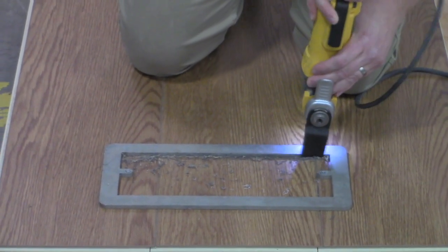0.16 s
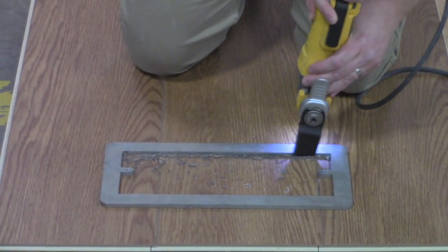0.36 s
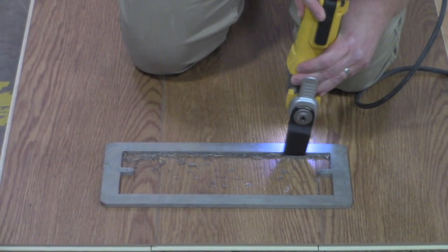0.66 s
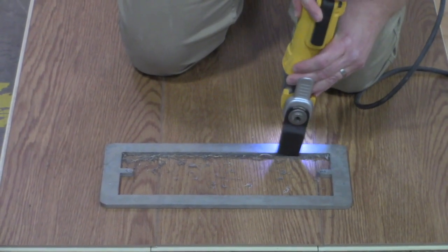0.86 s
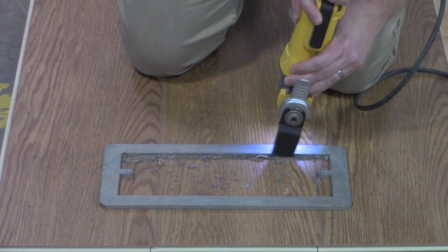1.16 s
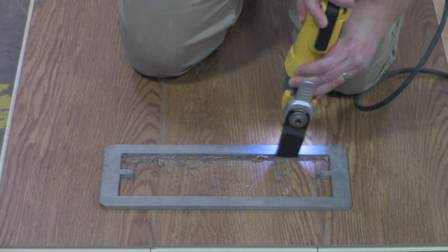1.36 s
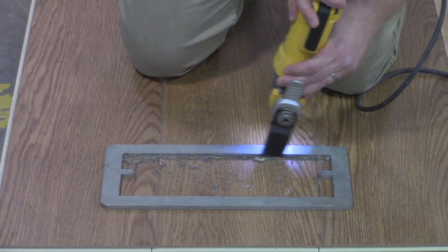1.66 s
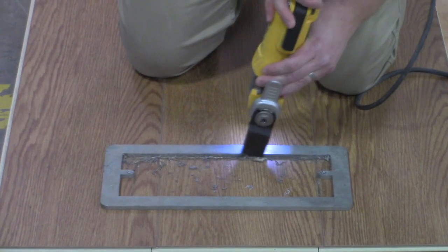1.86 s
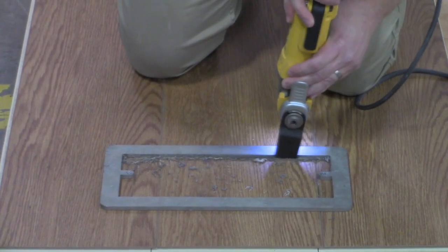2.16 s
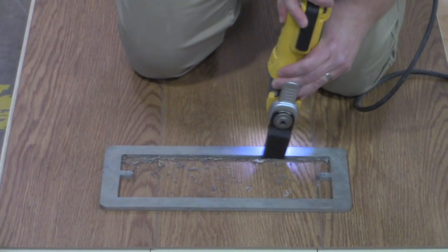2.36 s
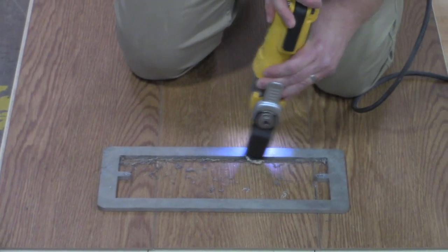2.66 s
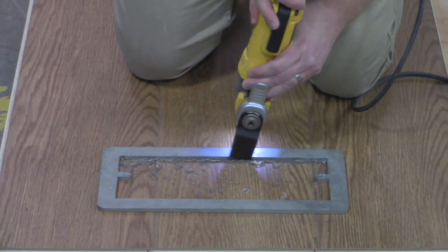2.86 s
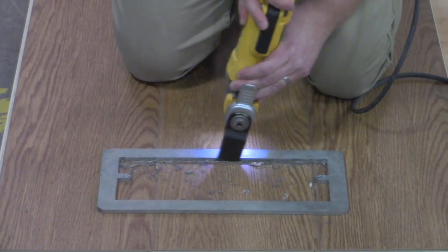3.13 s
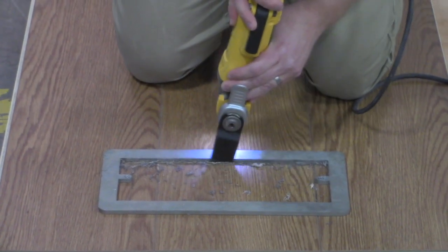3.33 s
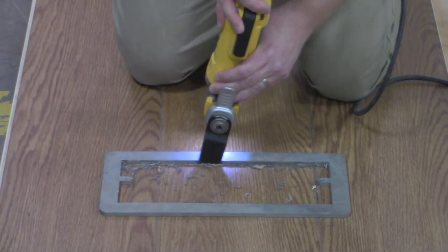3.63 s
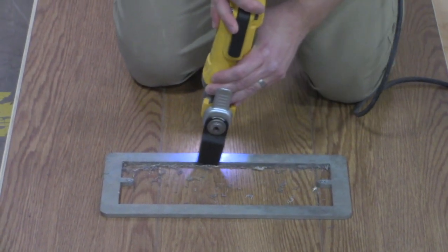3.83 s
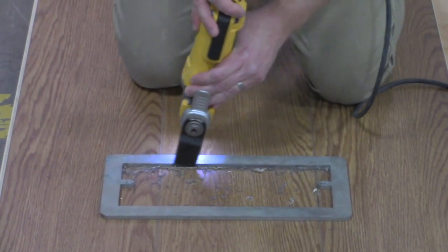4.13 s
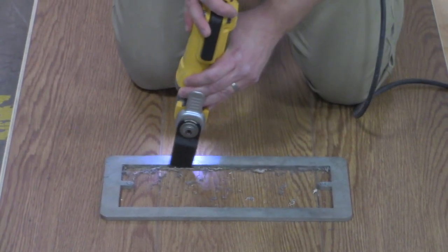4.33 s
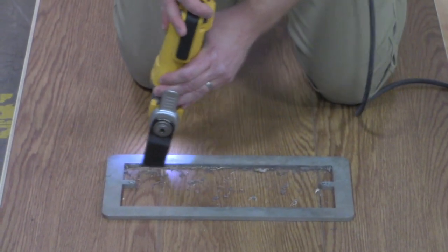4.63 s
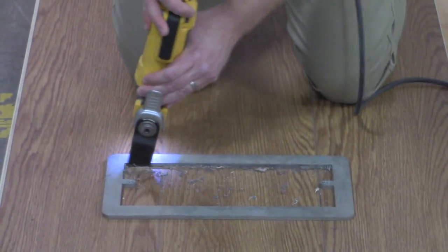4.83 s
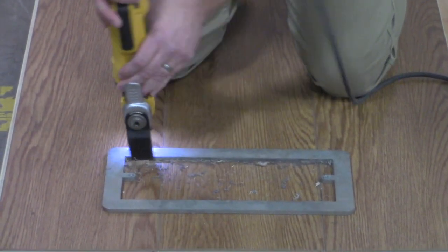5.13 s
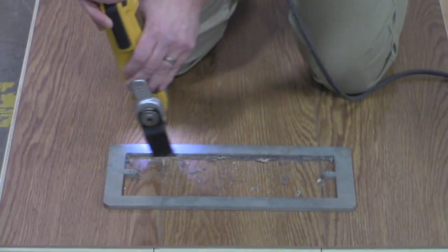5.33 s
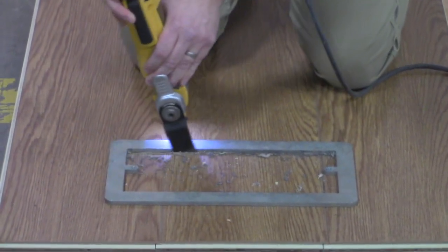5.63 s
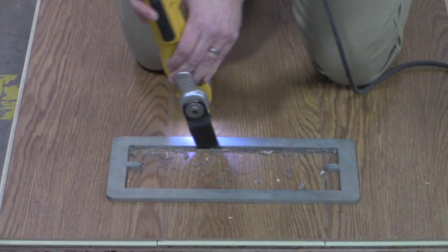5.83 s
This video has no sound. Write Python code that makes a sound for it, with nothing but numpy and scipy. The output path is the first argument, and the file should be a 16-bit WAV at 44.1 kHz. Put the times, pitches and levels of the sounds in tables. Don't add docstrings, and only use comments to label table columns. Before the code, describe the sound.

A corded oscillating saw buzzes in a harsh, nasal whine, sagging and recovering as its blade grinds along a slot in a wooden floor.

```python
import sys
import numpy as np
from scipy import signal
from scipy.fft import rfft, irfft
from scipy.io import wavfile
from scipy.ndimage import uniform_filter1d

SR = 44100
rng = np.random.default_rng(int(sys.argv[2]) if len(sys.argv) > 2 else 0)


def field_ratio(decibels):
    return 10 ** (np.asarray(decibels, dtype=float) / 20)


def int16_out(signal):
    q = np.round(np.clip(np.atleast_2d(signal).T, -1, 1) * 32767)
    wavfile.write(sys.argv[1], SR, q.astype(np.int16))


N = 264159
HOP = 128

ZONES_HZ = [900, 2900, 5400, 16000]


def curve(table, t):
    times, values = np.transpose(table)
    return np.interp(t, times, values)


def held(table, t):
    rows = np.array(table, float)
    current = np.searchsorted(rows[:, 0], t, "right") - 1
    return rows[np.clip(current, 0, None), 1:].T


def bursts(table, t, rise_db_s, fall_db_s, rest_db):
    start, hold, db = np.transpose(table)[:, :, None]
    early = np.maximum(start - t, 0)
    late = np.maximum(t - start - hold, 0)
    db = db - rise_db_s * early - fall_db_s * late
    return 10 * np.log10(np.sum(field_ratio(2 * db), axis=0) + field_ratio(2 * rest_db))


def bumps(table, t):
    centre, width, size = np.transpose(table)[:, :, None]
    return np.sum(size * np.exp(-((t - centre) / width) ** 2), axis=0)


def walk(rate_hz, count):
    k = max(int(SR / HOP / rate_hz), 1)
    x = rng.standard_normal((count, N // HOP + 2))
    x = uniform_filter1d(uniform_filter1d(x, k, axis=1), k, axis=1)
    return x / x.std(axis=1, keepdims=True)


def up(x):
    return np.interp(np.arange(N), HOP * np.arange(len(x)), x)


def colour_db(table, hz):
    f, db = np.transpose(table)
    return np.interp(np.log(np.maximum(hz, 1)), np.log(f), db)


def band(x, lo_hz, hi_hz):
    # (frequency [Hz], density [dB per Hz])
    scrape_colour = [(35, -69), (60, -19), (322, -5.5), (379, -1.5), (489, -13.5), (745, 0), (962, -7),
                     (1500, -5), (1680, -5), (1850, -2.5), (4700, 0.5), (10400, -2), (15800, -19.5)]
    hz = np.fft.rfftfreq(N, 1 / SR)
    inside = (hz >= lo_hz) & (hz < hi_hz)
    y = irfft(rfft(x) * field_ratio(colour_db(scrape_colour, hz)) * inside, N)
    return y / y.std()


def motor(t):
    # (time [s], stroke rate [Hz])
    speed = [(0.0, 335.4), (0.17, 356), (0.535, 380.7), (0.874, 341.2), (1.139, 326.4), (1.356, 342),
             (1.579, 382.8), (1.783, 377.4), (2.604, 374), (2.953, 357), (3.28, 333.9), (3.449, 318.7),
             (4.265, 334.9), (4.484, 317.9), (5.001, 350.1), (5.44, 376.6), (5.534, 379.5), (5.99, 349.2)]
    # (time [s], half width [s], sag [Hz])
    bogs = [
        (2.106, 0.15, 48),
        (3.083, 0.094, 21),
        (5.211, 0.12, 17),
        (1.186, 0.088, -4),
        (3.799, 0.098, -6),
        (3.93, 0.18, 5),
        (4.761, 0.032, 3),
    ]
    hz = up(curve(speed, t) - bumps(bogs, t))
    return uniform_filter1d(hz, size=SR // 20, mode="nearest")


def cut(t):
    # (time [s], blade hiss [dB])
    work = [(0.0, -42.5), (0.08, -43.5), (1.33, -47.5), (1.4, -52.5), (1.65, -42.5), (2.03, -49),
            (2.38, -42.5), (3.22, -47.5), (3.6, -41), (3.75, -50), (4.05, -41.5), (4.14, -50), (4.59, -44),
            (4.74, -46.5), (5.19, -40), (5.25, -48.5), (5.55, -40.5), (5.99, -44)]
    # (start [s], hold [s], level [dB])
    pushes = [(0.081, 0.005, -40), (0.206, 0.033, -39.5), (0.446, 0.097, -33), (0.641, 0.086, -40.5),
              (0.812, 0.18, -35), (1.054, 0.28, -38.5), (1.187, 0.018, -34.5), (1.321, 0.027, -37),
              (1.611, 0.3, -37.5), (1.661, 0.06, -34.5), (2.067, 0.015, -41.5), (2.354, 0.24, -37.5),
              (2.43, 0.055, -37.5), (2.669, 0.038, -36.5), (2.761, 0.17, -39), (3.029, 0.094, -40),
              (3.226, 0.25, -39.5), (3.546, 0.15, -35.5), (3.903, 0.29, -37), (4.078, 0.049, -37.6),
              (4.301, 0.24, -41.0), (4.603, 0.14, -36), (4.856, 0.053, -42.5), (4.991, 0.014, -40.5),
              (5.097, 0.11, -34), (5.408, 0.25, -42.8), (5.74, 0.034, -39.3), (5.854, 0.11, -41)]
    # (start [s], hold [s], level [dB])
    chatters = [(0.225, 0.073, -42), (0.96, 0.033, -39), (1.177, 0.013, -33.5), (1.271, 0.016, -39),
                (1.721, 0.067, -40), (2.177, 0.16, -45), (2.391, 0.246, -40.5), (2.708, 0.029, -39.5),
                (2.836, 0.089, -41), (3.203, 0.099, -40.2), (3.535, 0.093, -36.5), (4.049, 0.049, -38),
                (4.553, 0.12, -37.5), (4.953, 0.021, -40.5), (5.034, 0.12, -39.5), (5.506, 0.134, -40.4),
                (5.747, 0.13, -40.5), (5.96, 0.018, -36.0)]
    # (start [s], hold [s], added rasp share [0-1])
    tears = [
        (0.187, 0.076, 0.16),
        (1.876, 0.092, 0.16),
        (2.25, .09, 0.3),
        (2.747, .19, 0.13),
        (2.938, .09, 0.24),
        (3.37, 0.13, 0.13),
        (4.736, .34, 0.13),
        (5.508, .23, 0.33),
    ]
    blade_db = curve(work, t)
    board_db = bursts(pushes, t, rise_db_s=197, fall_db_s=277, rest_db=-46)
    teeth_rest_db = -41.5 + 0.32 * (board_db + 39.5) + 0.17 * (blade_db - blade_db.mean())
    teeth_db = bursts(chatters, t, rise_db_s=280, fall_db_s=300, rest_db=teeth_rest_db)
    torn = sum(share * (t >= s) * (t < s + hold) for s, hold, share in tears)
    board_rasp = field_ratio(2 * (-51.5 - board_db)) + torn
    teeth_rasp = np.minimum(field_ratio(2 * (-48 - teeth_db)), .33) + 0.8 * torn
    blade_rasp = 0.18 + teeth_rasp
    return np.array([board_db, teeth_db, blade_db]), np.array([board_rasp, teeth_rasp, blade_rasp])


def singing(t, phase, hz, zone_gain, loose, count=40):
    # (frequency [Hz], level [dB])
    tone_colour = [(530, -48), (900, 2.5), (1120, 1), (1650, 2.5), (2060, 0), (2310, 2), (4540, 0.5),
                   (6410, -15), (7980, -12), (14000, -32)]
    # (time [s], multiple the board favours [number],
    # second favourite [number], multiple two blows cancel [number], multiple the teeth favour [number])
    grip = [(0.0, 6, 8, 3, 13), (0.19, 4, 6, 3, 12), (0.4, 6, 3, 8, 12), (0.6, 4, 5, 8, 11),
            (0.95, 7, 5, 3, 10), (1.39, 6, 3, 4, 9), (1.56, 4, 6, 8, 11), (1.64, 6, 4, 7, 12),
            (1.87, 4, 5, 3, 11), (1.96, 5, 7, 4, 13), (2.25, 6, 3, 7, 12), (2.6, 5, 6, 3, 12),
            (2.82, 4, 6, 5, 12), (3.03, 5, 7, 4, 13), (3.37, 3, 5, 8, 13), (3.51, 7, 6, 4, 13),
            (3.84, 5, 7, 6, 13), (4.07, 7, 8, 4, 13), (4.22, 3, 5, 6, 12), (4.56, 8, 5, 3, 10),
            (4.73, 7, 3, 6, 9), (4.93, 7, 4, 3, 12), (5.25, 6, 7, 4, 11), (5.51, 7, 8, 4, 13)]
    grip_db = [7, 4, -5, 6.5]
    blade_ring_hz, ring_width_hz, ring_db = 9400, 800, 5
    k = np.arange(3, count)[:, None]
    f = k * hz
    db = colour_db(tone_colour, f) + ring_db / (1 + ((f - blade_ring_hz) / ring_width_hz) ** 2)
    db += (1.2 + 1.2 * (k > 8)) * walk(8, count=len(k))
    db += 2.8 * loose * walk(24, count=len(k))
    lift = sum(lift_db * (k == np.round(m)) for lift_db, m in zip(grip_db, held(grip, t)))
    db += uniform_filter1d(lift, size=5, axis=1)
    gain = field_ratio(db)
    zone = np.clip(np.digitize(f, ZONES_HZ) - 1, 0, 2)
    for z in range(3):
        power = np.sum(gain ** 2 * (zone == z), axis=0)
        gain = np.where(zone == z, gain * zone_gain[z] * np.sqrt(2 / power), gain)
    start = 2 * np.pi * rng.random((len(k), 1))
    drift = 1.03 * walk(2.5, count=len(k))
    jitter = 0.097 * k * loose * walk(60, count=1)
    turn = start + drift + jitter
    return sum(up(g) * np.cos(n * phase + up(p)) for n, g, p in zip(k[:, 0], gain, turn))


def boards(t, phase, loose):
    # (start [s], hold [s], level [dB])
    drums = [(0.119, 0.14, -50.5), (0.806, 0.026, -39.5), (0.986, 0.008, -46), (1.129, 0.019, -48),
             (1.287, 0.027, -47.5), (1.455, 0.005, -50.9), (1.705, 0.177, -47.5), (2.013, 0.006, -42.5),
             (2.156, 0.008, -49.5), (2.37, 0.005, -46), (2.532, 0.46, -43.2), (2.653, 0.107, -43.5),
             (3.141, 0.061, -44.5), (3.361, 0.023, -46.5), (3.525, 0.055, -48.5), (3.703, 0.072, -52.5),
             (3.922, 0.1, -49), (4.453, 0.26, -42.5), (4.87, 0.026, -48.5), (5.026, 0.047, -46),
             (5.589, 0.007, -46.5), (5.857, 0.13, -41.5)]
    # (start [s], hold [s], level [dB])
    doubles = [(0.083, 0.009, -53), (0.229, 0.014, -35), (0.496, 0.15, -46), (0.677, 0.066, -39),
               (0.976, 0.147, -47.5), (1.58, 0.091, -44.5), (1.713, 0.24, -39.5), (2.041, 0.034, -41.5),
               (2.142, 0.032, -44), (2.281, 0.009, -45.7), (2.416, 0.33, -38), (2.486, 0.069, -38.5),
               (2.843, 0.12, -43.5), (3.028, 0.041, -38), (3.216, 0.16, -38.5), (3.515, 0.018, -48),
               (3.705, 0.179, -44), (4.015, 0.14, -42), (4.366, 0.061, -42.5), (4.601, 0.098, -41.5),
               (4.862, 0.16, -51), (5.344, 0.084, -49.5), (5.733, 0.0047, -41.8), (5.815, 0.12, -46.5)]
    # (start [s], hold [s], level [dB])
    bounces = [
        (1.5, .02, -66),
        (2.64, .06, -57),
        (2.8, .03, -57),
        (2.92, .04, -57),
        (3.1, 0.61, -72),
        (4.53, .18, -58.5),
        (5.47, .04, -67.5),
        (5.63, .04, -66),
        (5.88, 0.1, -65),
    ]
    # (time [s], half width [s], drop [dB])
    lifts = [
        (.35, .03, 4),
        (1.2, .03, 6),
        (1.41, .035, 13),
        (1.53, 0.013, 9),
        (2.35, 0.01, 9),
        (4.29, 0.041, 4),
        (4.78, 0.019, 11),
        (5.26, 0.031, 10),
        (5.62, .012, 15),
    ]
    lift_db = bumps(lifts, t)
    one_db = up(bursts(drums, t, rise_db_s=135, fall_db_s=114, rest_db=-59) - lift_db)
    two_db = up(bursts(doubles, t, rise_db_s=340, fall_db_s=192, rest_db=-51) - lift_db)
    skip_db = up(bursts(bounces, t, rise_db_s=250, fall_db_s=290, rest_db=-83))
    flutter = walk(22, count=4) * loose
    one = field_ratio(one_db + 3.24 * up(flutter[0])) * np.cos(phase + 0.49 * up(flutter[1]))
    two = field_ratio(two_db + 2.26 * up(flutter[2])) * np.cos(2 * phase + 0.54 * up(flutter[3]))
    halves = sum(field_ratio(db) * np.cos((k + .5) * phase) for k, db in enumerate([-8, -1, -3]))
    bouncing = np.clip((skip_db + 78) / 8, 0, 1)
    return np.sqrt(2) * (one + two + bouncing * field_ratio(skip_db) * halves)


def rasp(phase, zone_gain, board_gain):
    gate = np.exp(.4 * np.cos(phase) + .15 * np.cos(2 * phase))
    patch = field_ratio(1.1 * walk(15, count=4))
    noise = rng.standard_normal(N) * gate
    zone_gain = uniform_filter1d(zone_gain, size=15, axis=1) * patch[:3]
    out = sum(up(zone_gain[z]) * band(noise, ZONES_HZ[z], ZONES_HZ[z + 1]) for z in range(3))
    fizz_gain = zone_gain[2] ** 2 / zone_gain[2].mean()
    out += field_ratio(-23.5) * up(fizz_gain) * band(noise, 9000, ZONES_HZ[3])
    low_gain = np.sqrt(uniform_filter1d(board_gain, size=19)) * patch[3]
    return out + field_ratio(-39.5) * up(low_gain) * band(rng.standard_normal(N), 0, ZONES_HZ[0])


def knocks():
    # (time [s], peak [dB])
    catches = [
        (0.197, -28),
        (1.9494, -25),
        (2.3525, -20),
        (4.855, -23),
        (5.0672, -19),
        (5.5995, -26),
    ]
    t = np.arange(N) / SR
    blows = sum(field_ratio(db - 14) * (t > s) * np.exp(-np.abs(t - s) / .015) for s, db in catches)
    return uniform_filter1d(blows, size=SR // 150) * band(rng.standard_normal(N), 900, 4300)


def room(x):
    t60_s = .25
    t = np.arange(SR // 2) / SR
    tail = rng.standard_normal(len(t)) * np.exp(-np.log(1000) * t / t60_s) * (t > .004)
    return signal.fftconvolve(x, tail / np.sqrt(np.sum(tail ** 2)))[:N]


def microphone(tool):
    room_db, side_db, side_hz = -16, -35, [2960, 8800]
    echo = room(tool)
    side_filter = signal.butter(1, side_hz, "band", fs=SR)
    side = signal.lfilter(*side_filter, echo - 1.5 * tool) + .6 * echo
    mid = tool + field_ratio(room_db) * echo
    return np.array([mid + field_ratio(side_db) * side, mid - field_ratio(side_db) * side])


def scene():
    t = HOP * np.arange(N // HOP + 2) / SR
    hz = motor(t)
    phase = 2 * np.pi * np.cumsum(hz) / SR
    zone_db, share = cut(t)
    share = np.clip(uniform_filter1d(share, size=5, axis=1), .012, .97)
    loose = np.clip(.08 + 2.4 * np.sqrt(share[0]), 0, 1.3)
    gain = field_ratio(zone_db + 1.5 * loose * walk(22, count=1))
    control_hz = np.interp(t * SR, np.arange(N), hz)
    tool = singing(t, phase, control_hz, gain * np.sqrt(1 - share), loose)
    tool += boards(t, phase, loose)
    tool += rasp(phase, gain * np.sqrt(share), gain[0] * np.sqrt(share[0]))
    tool += knocks()
    return microphone(tool)


def top_cut(x):
    return signal.sosfilt(signal.butter(12, 16990, fs=SR, output="sos"), x)


def record(dry):
    limited = np.tanh(13 * dry) / 12
    top = signal.ellip(10, .2, 70, 15830, fs=SR, output="sos")
    rumble = signal.butter(1, 70., "high", fs=SR, output="sos")
    mix = signal.sosfilt(np.vstack([top, rumble]), limited)
    return top_cut(mix)


dry = scene()
out = record(dry)
int16_out(out)
```